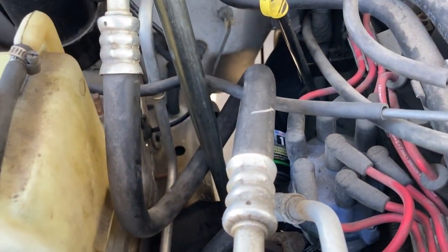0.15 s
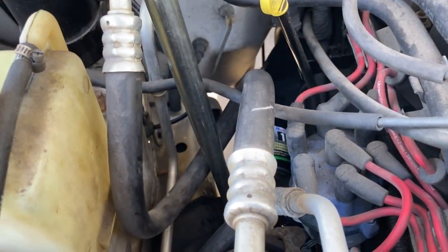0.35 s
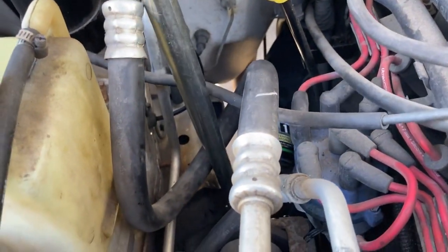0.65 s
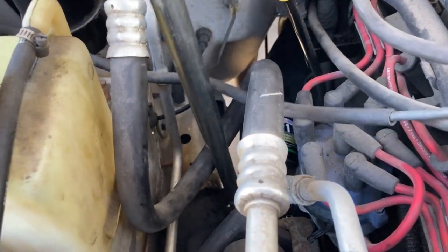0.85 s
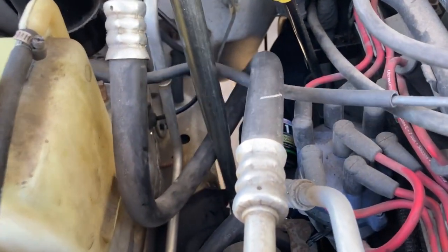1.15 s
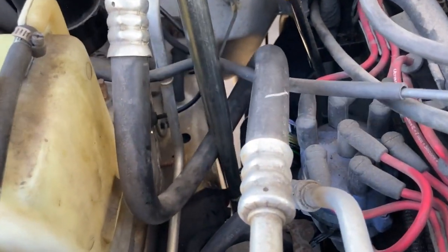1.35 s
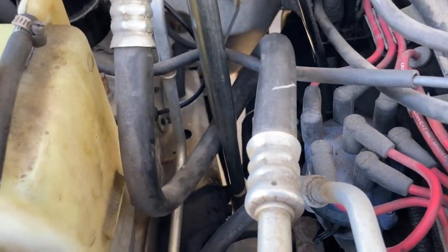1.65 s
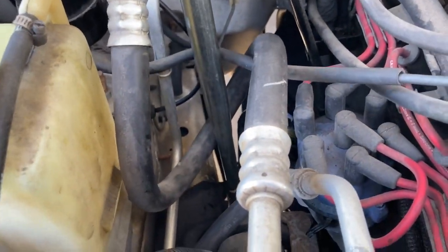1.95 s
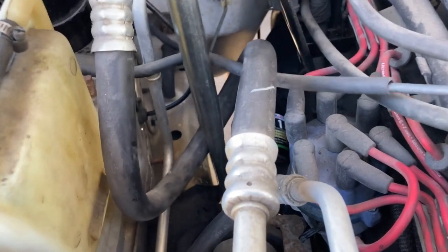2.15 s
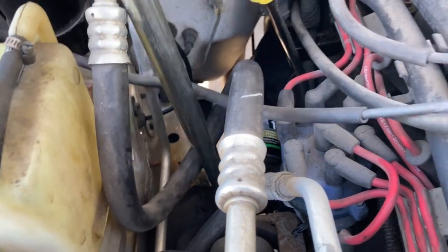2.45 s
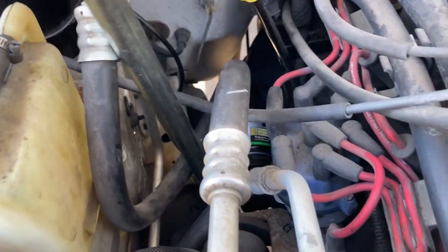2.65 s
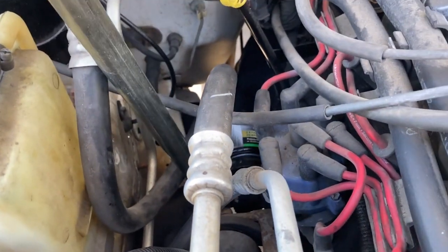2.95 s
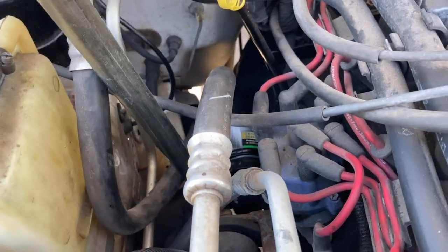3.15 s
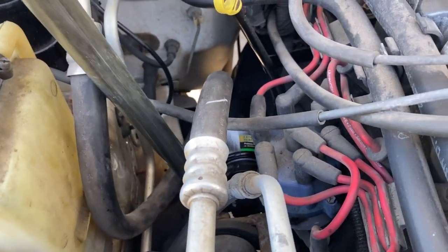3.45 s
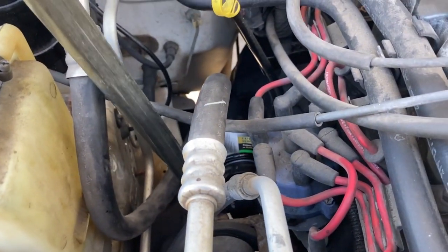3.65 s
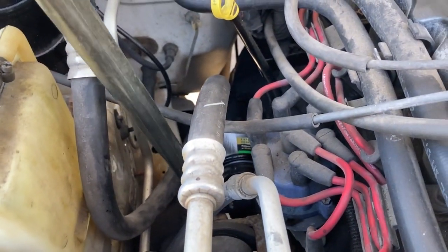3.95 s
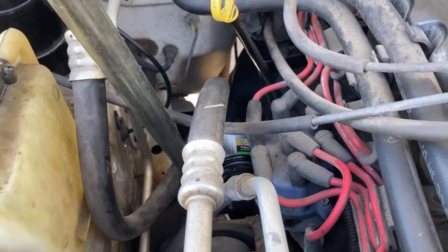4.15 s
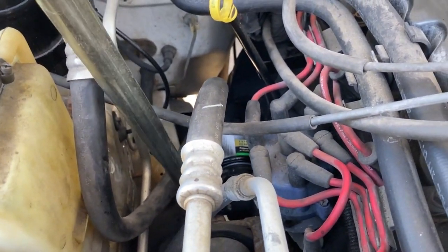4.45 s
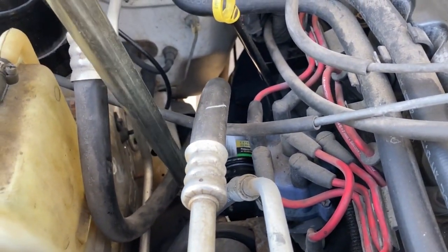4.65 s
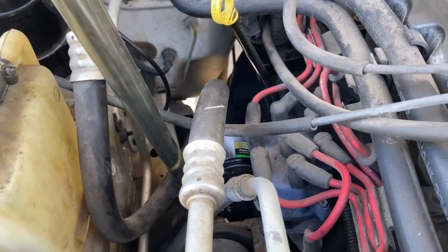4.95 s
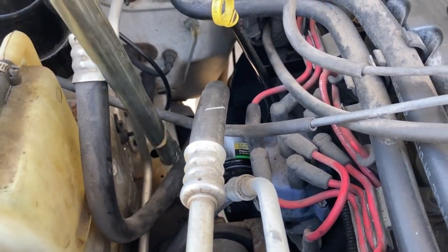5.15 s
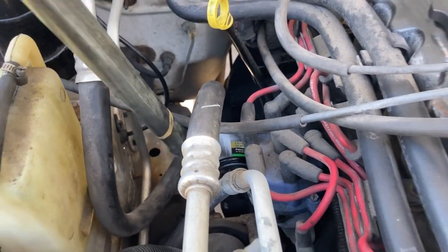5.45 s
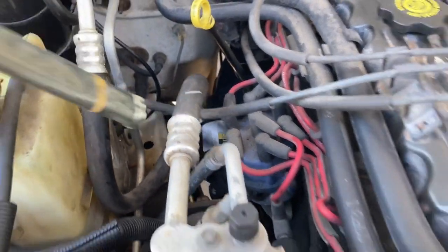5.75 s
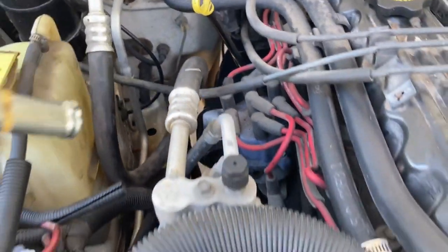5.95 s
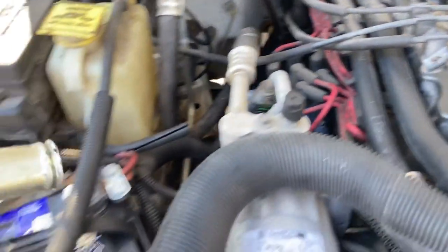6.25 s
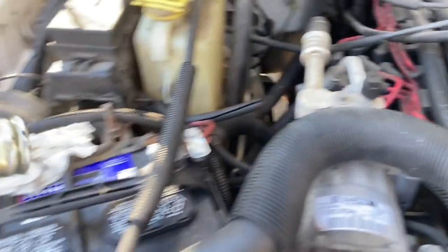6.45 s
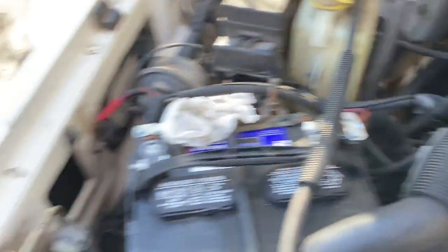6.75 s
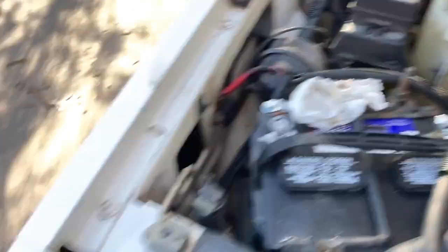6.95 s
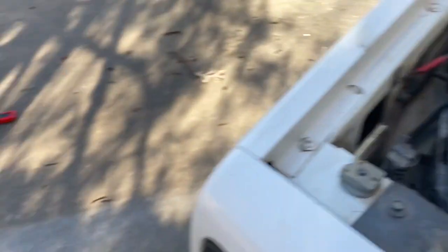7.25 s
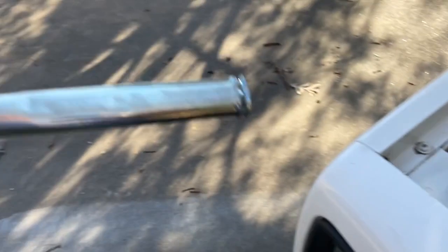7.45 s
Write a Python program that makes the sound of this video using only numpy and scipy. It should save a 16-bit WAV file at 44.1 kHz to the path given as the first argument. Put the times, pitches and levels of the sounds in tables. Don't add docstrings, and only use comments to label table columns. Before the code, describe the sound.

Close outdoor handling of a thin metal pipe in an engine bay under low, lumpy wind buffeting. Soft hose thumps come first, then a hard rattling cluster, gritty scrapes and several sharp bangs on sheet metal. The pipe comes free with a bright wavering ring, retriggered by small ticks, and dies away into wind and faint street hush.

```python
import sys
import numpy as np
from scipy import signal
from scipy.fft import rfft, irfft, next_fast_len
from scipy.io import wavfile
from scipy.ndimage import uniform_filter1d

SR = 44100
rng = np.random.default_rng(int(sys.argv[2]) if len(sys.argv) > 2 else 0)


def gain_from_db(level_db):
    decades = np.asarray(level_db, float) / 20
    return 10 ** decades


def digitize_waveform(pressure):
    field = np.atleast_2d(pressure).T
    bounded = np.clip(field, -1, 1)
    quanta = np.round(bounded * 32767).astype(np.int16)
    wavfile.write(sys.argv[1], SR, quanta)


N = 335153

# freq_hz, density_db
HUSH_SPECTRUM = [(120, -9.5), (200, -15.5), (450, -6.5), (750, -10), (1100, -9.5), (1400, -7.5),
                 (1800, -11), (3000, -14), (5000, -16.5), (8300, -27.5), (11500, -27.5), (15500, -42.5),
                 (16500, -72.5)]
# time_s, hum_db, hush_db
STREET_LEVELS = [(0.0, -60.5, -80.5), (0.63, -56, -78.5), (2.16, -60, -78.5), (2.77, -52.5, -69.5),
                 (3.53, -67.5, -79), (5.5, -61.5, -75.5), (7.6, -63, -74)]
# pitch_hz, width_hz, start_s, stop_s, level_db
FAR_WHINE = (1300.5, 56.5, 6.5, 7.1, -66)
# freq_hz, phase_rad
PORT_PHASE = [(100, 0), (300, .9), (480, 2.2), (750, 2.5), (1050, 1.6), (1500, 2.6), (2700, 2.2),
              (3750, 2.2), (4300, 3.6), (5300, 3.1), (7900, .3), (8900, -.2), (11350, -2.85), (12100, -3.4),
              (14200, -6.2), (17000, -6.3)]

# freq_hz, density_db
RUMBLE_SPECTRUM = [(8.8, -59), (15, -37.5), (40, 1.5), (75, 6.5), (130, -2), (173, -9.5), (210, -22.5),
                   (335, -31), (400, -36.5), (520, -54.5), (880, -120)]
# freq_hz, density_db
EDGE_SPECTRUM = [(60, -31.0), (130, 3.5), (220, 2), (400, -17), (900, -37.5)]
# peak_s, peak_db, fall_s (to drop GUST_FALL_DB), left_right_db
GUSTS = [(.26, -43, 0.23, 9.5), (.6, -47, .5, 1), (.82, -43, 0.2, -3), (.93, -35, 0.2, 6),
         (1.4, -32, .17, 5), (1.82, -33, 0.2, -3.5), (2.22, -41.5, 0.13, 6.5), (2.55, -42, 0.27, 1),
         (2.71, -34.5, 0.16, -6.5), (2.95, -36.5, 0.6, 3), (3.029, -28, .045, 14.5), (3.45, -26.5, .07, 5),
         (3.56, -34.5, .15, 10), (3.66, -39, 0.35, -3), (3.84, -32.5, 0.09, 7), (4.0, -29.5, 0.06, 6),
         (4.17, -31, 0.13, 2.5), (4.53, -32, 0.22, -1.5), (4.72, -39.5, 0.05, -5), (4.94, -31.5, 0.13, -6),
         (5.23, -39, 0.6, -5), (5.48, -31.5, 0.11, -11), (6.33, -29.5, 0.11, 0), (6.46, -27, 0.32, -1),
         (6.7, -29, 0.05, -8), (6.85, -40, 0.65, 10), (7.007, -23.5, 0.05, -3.5), (7.09, -32.5, .12, 0),
         (7.17, -31.5, 0.06, 2), (7.3, -32.5, 0.19, 2)]
GUST_FALL_DB, BREEZE_DB, BREEZE_PAN_DB = 20, -50, 1

# pitch_hz, width_hz, level_db
HELD_PEAKS = [(1195, 56, -3), (1650, 60, -26), (1990, 40, -4.5), (2687, 160, 5), (3100, 58, 0),
              (3338, 38, 3.5), (3755, 380, 11), (4260, 60, 8), (4620, 77, 6.5)]
GRIP_WIDENS = 2.2
# freq_hz, density_db
HISS_SPECTRUM = [(2500, -38), (4500, -20), (6500, -17), (8500, -10.5), (10500, -3.5), (12000, -9.5),
                 (15300, -16), (16500, -43)]
# pitch_hz, width_hz, level_db
HISS_PEAKS = [(6570, 150, -18), (7830, 150, -11.5), (8570, 200, -15), (10160, 200, -24)]
# start_s, length_s, pipe_db, hiss_db, swell_db
STROKES = [(0.266, 0.19, -78, -77, 1), (.54, 0.06, -67.5, -64, 6), (1.018, 0.041, -68, -72, 2),
           (2.275, 0.15, -92, -76.5, -9), (2.72, .09, -55, -64, -3), (2.83, .07, -63, -56.5, -8.5),
           (3.002, 0.11, -69, -57.5, 5), (3.108, 0.064, -59.5, -54.5, 0.5), (3.19, 0.038, -74, -66.5, -6.5),
           (3.485, 0.16, -45.5, -60, 2), (3.662, .3, -42.5, -53, 7.5), (4.007, 0.046, -44.5, -55.5, 4),
           (4.58, 0.19, -53.5, -59, 11.5), (4.8, 0.13, -46.5, -53.5, 5), (5.086, .11, -49, -59, 3.5),
           (5.29, .05, -42, -52, 3), (6.87, .11, -69, -71.5, 2), (7.0, 0.039, -54, -61, 2.5),
           (7.477, 0.14, -65, -69.5, 4)]
STROKE_ATTACK_S, STROKE_RELEASE_S, STROKE_EDGE_DB = 0.066, .05, 27

# time_s, crack_db, thud_db, top_db
HOSE_KNOCKS = [(0.391, -69, -46, -57.5), (0.5052, -34, -25.5, -42.5), (0.5816, -48, -44, -57),
               (0.6493, -63, -34.5, -85), (0.6925, -30.5, -20, -49), (0.877, -44, -30.5, -54),
               (0.9278, -34.5, -24.5, -52), (1.5313, -49, -59, -55), (2.4983, -25, -15, -31.5),
               (2.5242, -14, -12, -22.5), (2.568, -24.5, -31, -37.5), (2.61, -29, -17.5, -40),
               (2.6518, -50, -23.5, -52), (2.727, -23, -48, -40), (2.7441, -42, -20, -48),
               (2.821, -33, -33, -26.5), (2.9422, -32.5, -24, -42.5), (3.1223, -39.5, -35.5, -60),
               (4.3186, -41, -36, -78), (4.338, -24.5, -52, -50.5), (4.3533, -23, -37.5, -48),
               (4.4869, -62, -40.5, -90), (4.819, -28, -48, -49)]
HOSE_T60_S, HOSE_CLANG_DB = 0.046, -15
# time_s, crack_db, thud_db, clang_db, top_db
SHEET_KNOCKS = [(5.0943, -25, -42.5, -40, -31), (5.1039, -10, -29, -25.5, -9.5),
                (5.1928, -13.5, -6, -9, -28), (5.2372, -33, -19, -31, -41),
                (5.3107, -17.5, -28.5, -35, -39.5), (5.335, -45, -15.5, -19, -38),
                (5.4356, -18.5, -28, -17, -18), (5.6353, -23, -44, -35.5, -33.5),
                (6.322, -38.5, -48.5, -43.5, -52), (6.3926, -35, -55, -40.5, -77),
                (6.999, -54, -43, -44.5, -74.5), (7.0237, -38.5, -65, -59, -62),
                (7.2616, -36.5, -61, -37.5, -46), (7.3037, -54.5, -42.5, -51, -66.5),
                (7.5503, -48.5, -70.5, -53.5, -62)]
SHEET_T60_S = 0.06
# time_s, crack_db, top_db
TICKS = [(5.662, -37, -37.5), (5.7894, -43, -43.5), (5.821, -58, -49), (5.9117, -32, -33),
         (5.9444, -45, -34), (5.9805, -37.5, -27.5), (6.0447, -48, -47), (6.0845, -61, -47),
         (6.1174, -67, -43), (6.169, -57, -47.5), (6.2444, -58, -55.5)]
TICK_T60_S, TICK_BODY_DB = 0.071, -66
# freq_hz, density_db
CRACK_TOP_SPECTRUM = [(3000, -19.5), (5000, -5), (8000, -6), (10300, -2.5), (12000, -13.5), (15200, -14.5),
                      (16500, -41)]
# pitch_hz, level_db, t60_s
THUD_MODES = [(191, -27, 0.077), (318.3, -16.5, .06), (373.7, -13, 0.071)]
# pitch_hz, level_db, t60_s
PANEL_MODES = [(854, -10.5, .15), (1082.6, -14, 0.22), (1184, -10.5, 0.26), (1645, 5, 0.1), (1712, 0, 0.11),
               (2352, -6.5, 0.059)]
# start_s, stop_s
PANEL_SPAN_S = (5.15, 5.5)

# pitch_hz, level_db
BENDING_LINES = [
    [(978, -2.5), (1000, 7)],
    [(2113, -4), (2127, 1), (2144, -1)],
    [(2950, -0.5), (2964, -2), (2978, -6.5)],
    [(3650, -2), (3676, -2)],
]
# pitch_hz, level_db
WALL_LINES = [
    [(5912, -11), (5933, 0), (5957, -11.5), (6084, -12), (11375, -10.5)],
    [(10008, -2), (10019, 0.5), (10040, -2)],
    [(13023, 0), (13035, -14.5)],
    [(14552, -14.5), (14590, -10.5), (15030, -2.5), (15062, -10)],
]
# time_s, group1_db, group2_db, group3_db, group4_db
BENDING_CONTACTS = [
    (5.108, -55, -58, -43, -65.5),
    (5.195, -36.5, -38, -39, -45),
    (5.436, -47.5, -40.5, -48.5, -46.5),
    (5.636, -39.5, -31, -24, -47),
    (5.80, -42.5, -34, -37.5, -57.5),
    (5.912, -38.5, -44.5, -42, -40),
    (5.965, -54, -57, -58.5, -52.5),
    (6.065, -75, -63, -42.5, -52.5),
    (6.26, -75, -67.5, -63, -65.5),
]
BENDING_FADES_DB_PER_S = [30, 20, 45, 38]
# time_s, group1_db, group2_db, group3_db, group4_db
WALL_CONTACTS = [(5.108, -39.5, -35, -45, -42.5), (5.195, -39.5, -29, -49, -46),
                 (5.436, -39.5, -46.5, -51, -68), (5.636, -23, -29.5, -53, -29),
                 (5.79, -34, -22, -62, -36.5), (5.912, -28, -31.5, -43, -42),
                 (5.945, -23, -22.5, -41, -38.5), (5.981, -28.5, -20, -27.5, -33),
                 (6.085, -33, -26.5, -31.5, -37), (6.245, -37, -37, -40, -57),
                 (6.385, -49, -59, -53.5, -93)]
WALL_FADES_DB_PER_S = [72, 101, 70, 130]
FIRST_BLOW_S, CONTACT_S, RING_END_S = 5.108, .012, 6.95


def rms_one(x):
    return x / np.sqrt(np.mean(x ** 2) + 1e-20)


def in_time(rows):
    time_s, *columns = np.transpose(rows)
    return [np.interp(np.arange(N) / SR, time_s, column) for column in columns]


def noise(spectrum, channels=1):
    freq_hz, density_db = np.transpose(spectrum)
    size = next_fast_len(N)
    bins_hz = np.fft.rfftfreq(size, 1 / SR) + 1
    white = rfft(rng.standard_normal((channels, size)))
    gain = gain_from_db(np.interp(np.log(bins_hz), np.log(freq_hz), density_db))
    return rms_one(irfft(white * gain, size)[:, :N])


def drift(rate_hz):
    r = np.exp(-40 * np.pi * rate_hz / SR)
    slow = signal.lfilter([1], [1, -2 * r, r * r], rng.standard_normal(N // 20 + 2002))[2000:]
    return np.interp(np.arange(N) / 20, np.arange(len(slow)), rms_one(slow))


def resonance(x, pitch_hz, width_hz):
    r = np.exp(-np.pi * width_hz / SR)
    zeros = np.array([1, 0, -1]) * (1 - r * r) / 2
    return signal.lfilter(zeros, [1, -2 * r * np.cos(2 * np.pi * pitch_hz / SR), r * r], x)


def band(x, low_hz, high_hz):
    return signal.sosfilt(signal.butter(2, [low_hz, high_hz], "band", fs=SR, output="sos"), x)


def ports(x, bay_db):
    size = next_fast_len(N)
    bins_hz = np.fft.rfftfreq(size, 1 / SR) + 1e-3
    freq_hz, phase_rad = np.transpose(PORT_PHASE)
    turn = np.exp(.5j * np.interp(np.log(bins_hz), np.log(freq_hz), phase_rad))
    dull = gain_from_db(min(bay_db, -3)) / (1 + (bins_hz / 4000) ** 4)
    paths = []
    for _ in range(2):
        echoes = 0
        for delay_s in rng.uniform(0.001039, .03, 6):
            echoes = echoes + rng.choice([-1, 1]) * np.exp(-2j * np.pi * bins_hz * delay_s - delay_s / 0.014)
        paths.append(1 + dull * echoes)
    return irfft(rfft(x, size) * np.array([paths[0] / turn, paths[1] * turn]), size)[:, :N]


def street():
    hum_db, hush_db = in_time(STREET_LEVELS)
    hush = noise(HUSH_SPECTRUM, channels=3)
    hush = ports(hush[2], bay_db=2.5) + 0.62 * band(hush[:2], 100, 5800)
    low = signal.sosfilt(signal.butter(2, 560, fs=SR, output="sos"), hush)
    unrest_db = drift(3)
    hum = gain_from_db(hum_db + 7) * rms_one(low)
    return hum + gain_from_db(hush_db + 17.5 + unrest_db) * rms_one(hush - low)


def far_whine():
    pitch_hz, width_hz, start_s, stop_s, level_db = FAR_WHINE
    tone = resonance(rng.standard_normal(N), pitch_hz, width_hz)
    tone = resonance(tone, pitch_hz, width_hz)
    progress = np.clip((np.arange(N) / SR - start_s) / (stop_s - start_s), 0, 1)
    return gain_from_db(level_db) * rms_one(tone) * np.sin(np.pi * progress) ** .5


def gusting():
    t = np.arange(0, N, 64) / SR
    peak_s, peak_db, fall_s, pan_db = np.transpose(GUSTS)[:, :, None]
    power = gain_from_db(2 * (peak_db - GUST_FALL_DB * abs(t - peak_s) / fall_s))
    breeze = gain_from_db(2 * BREEZE_DB)
    total = power.sum(axis=0) + breeze
    side_db = ((power * pan_db).sum(axis=0) + breeze * BREEZE_PAN_DB) / total
    return in_time(np.transpose([t, 10 * np.log10(total), side_db]))


def wind():
    level_db, pan_db = gusting()
    lumps_db = np.array([drift(12.3), drift(22)])
    rumble = noise(RUMBLE_SPECTRUM, channels=2)
    rumble = rms_one((rumble - 0.068 * rumble[::-1]) * gain_from_db(2.1 * lumps_db))
    edge = noise(EDGE_SPECTRUM, channels=2)
    edge = rms_one(edge * gain_from_db(6.3 * lumps_db + 4.54 * drift(27)))
    edge_db = -9.5 + 0.21 * (level_db + 36)
    gusts = gain_from_db(level_db + 1.5 + pan_db * [[.5], [-.5]]) * (rumble + gain_from_db(edge_db) * edge)
    return band(band(gusts, 23, 800), 25, 1200)


def held_pipe(x, broad_db, patchy_db):
    peaks = 0
    for pitch_hz, width_hz, level_db in HELD_PEAKS:
        damped_hz = GRIP_WIDENS * width_hz
        peak = resonance(resonance(x, pitch_hz, damped_hz), pitch_hz, damped_hz)
        peaks = peaks + gain_from_db(level_db + patchy_db * drift(11)) * rms_one(peak)
    return rms_one(rms_one(peaks) + gain_from_db(broad_db) * rms_one(band(x, 1200, 4450)))


def stroking():
    t, body, hiss = np.arange(N) / SR, 0, 0
    for start_s, length_s, body_db, hiss_db, swell_db in STROKES:
        stop_s = start_s + length_s
        corners_s = [start_s - STROKE_ATTACK_S, start_s, stop_s, stop_s + STROKE_RELEASE_S]
        corners_db = [-swell_db - STROKE_EDGE_DB, -swell_db, 0, -STROKE_EDGE_DB]
        shape = gain_from_db(np.interp(t, corners_s, corners_db, -200, -200))
        body = np.maximum(body, gain_from_db(body_db) * shape)
        hiss = np.maximum(hiss, gain_from_db(hiss_db) * shape)
    return body, hiss


def rubbing():
    body, fine = stroking()
    clicks = rng.random(N) < 4000 * gain_from_db(1.5 * drift(20)) / SR
    sizes = gain_from_db(3.9 * np.minimum(rng.exponential(1, N), 5))
    grit = clicks * sizes * rng.choice([-1, 1], N)
    hiss = noise(HISS_SPECTRUM)[0] * gain_from_db(2.14 * drift(37))
    modes = sum(gain_from_db(db) * rms_one(resonance(hiss, hz, width_hz)) for hz, width_hz, db in HISS_PEAKS)
    hiss = rms_one(hiss + modes)
    return body * gain_from_db(3.0) * held_pipe(grit, broad_db=-4.5, patchy_db=4.5) + fine * gain_from_db(1.5) * hiss


def all_knocks():
    hoses = [(s, crack, thud, thud + HOSE_CLANG_DB, top, HOSE_T60_S) for s, crack, thud, top in HOSE_KNOCKS]
    sheet = [(*row, SHEET_T60_S) for row in SHEET_KNOCKS]
    ticks = [(s, crack, TICK_BODY_DB, TICK_BODY_DB, top, TICK_T60_S) for s, crack, top in TICKS]
    return np.transpose(hoses + sheet + ticks)


def bursts(levels_db, t60s, rises_s, tail_db=-14):
    out, t = np.zeros(N), np.arange(int(.3 * SR)) / SR
    for time_s, level_db, t60_s, rise_s in zip(all_knocks()[0], levels_db, t60s, rises_s):
        i = round(time_s * SR)
        decay = t / max(t60_s, .01)
        fall = gain_from_db(-60 * decay) + gain_from_db(tail_db - 22 * decay)
        out[i:i + len(t)] += (gain_from_db(level_db) * fall * (1 - np.exp(-t / rise_s)) ** 2)[:N - i]
    return out


def struck(modes, strength_db, soft_hz, late_s):
    out = np.zeros(N)
    at = ((all_knocks()[0] + late_s) * SR).astype(int)
    for pitch_hz, level_db, t60_s in modes:
        push = np.full(N, 1e-18)
        push_db = strength_db + level_db + rng.normal(0, 2.8, len(at))
        push[at] = gain_from_db(push_db) * rng.choice([-1, 1], len(at))
        r, w = gain_from_db(-60 / (t60_s * SR)), 2 * np.pi * pitch_hz / SR
        out += signal.lfilter([0, np.sin(w)], [1, -2 * r * np.cos(w), r * r], push)
    soft = np.exp(-2 * np.pi * soft_hz / SR)
    return signal.lfilter([(1 - soft) ** 2], [1, -2 * soft, soft * soft], out)


def knocks():
    time_s, crack_db, thud_db, clang_db, top_db, t60_s = all_knocks()
    white = rng.standard_normal(N)
    on_panel = (time_s > PANEL_SPAN_S[0]) & (time_s < PANEL_SPAN_S[1])
    crack = held_pipe(white, broad_db=2.5, patchy_db=4.0)
    out = bursts(crack_db + 1.5, 0.67 * t60_s, 0.029 * t60_s) * crack
    out += bursts(top_db + 1.5, 0.7 * t60_s, 0.03 * t60_s) * noise(CRACK_TOP_SPECTRUM)[0]
    clang = rms_one(band(white, 690, 1700))
    out += bursts(clang_db + 3.0 - 9 * on_panel, 0.94 * t60_s, 0.023 * t60_s) * clang
    out += struck(THUD_MODES, thud_db + 9.5, soft_hz=700, late_s=.006)
    panel_db = np.where(on_panel, clang_db + 1.5, -np.inf)
    return out + struck(PANEL_MODES, panel_db, soft_hz=3000, late_s=.0015)


def ringing(contacts, fades_db_per_s, groups):
    first = round(FIRST_BLOW_S * SR)
    out, t = np.zeros(N), np.arange(first, N) / SR
    contact_s, *levels_db = np.transpose(contacts)
    last = np.maximum(np.searchsorted(contact_s, t) - 1, 0)
    since_s = np.maximum(t - contact_s[last], 0)
    blur = int(CONTACT_S * SR)
    release = np.clip((RING_END_S - t) / .05, 0, 1)
    for group_db, fade, lines in zip(levels_db, fades_db_per_s, groups):
        gain = gain_from_db(group_db[last] - fade * since_s)
        gain = uniform_filter1d(gain, blur, origin=int(CONTACT_S * SR / 2) - 1)
        wavers = [(2.5 * drift(10)[first:], .6 * drift(8)[first:]) for _ in lines]  # dB, rad
        tone = 0
        for (pitch_hz, level_db), (waver_db, waver_rad) in zip(lines, wavers):
            phase = 2 * np.pi * pitch_hz * t + rng.uniform(0, 2 * np.pi) + waver_rad
            tone = tone + gain_from_db(level_db + waver_db) * np.sin(phase)
        out[first:] += gain * rms_one(tone) * release
    return out


def scene():
    bending = ringing(BENDING_CONTACTS, BENDING_FADES_DB_PER_S, BENDING_LINES)
    wall = ringing(WALL_CONTACTS, WALL_FADES_DB_PER_S, WALL_LINES)
    pipe = ports(bending + wall, bay_db=-12)
    background = street()
    knocks_and_whine = ports(knocks() + far_whine(), bay_db=-1)
    scrapes = ports(rubbing(), bay_db=4)
    return pipe + knocks_and_whine + scrapes + wind() + background


def top_cut(x):
    return signal.sosfilt(signal.butter(12, 16930, fs=SR, output="sos"), x)


def record(dry):
    rounded = .95 * np.tanh(dry / .95)
    return top_cut(rounded)


dry = scene()
out = record(dry)
digitize_waveform(out)
```